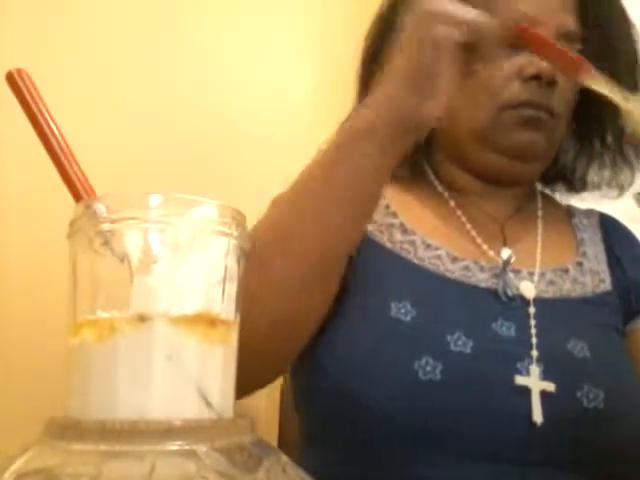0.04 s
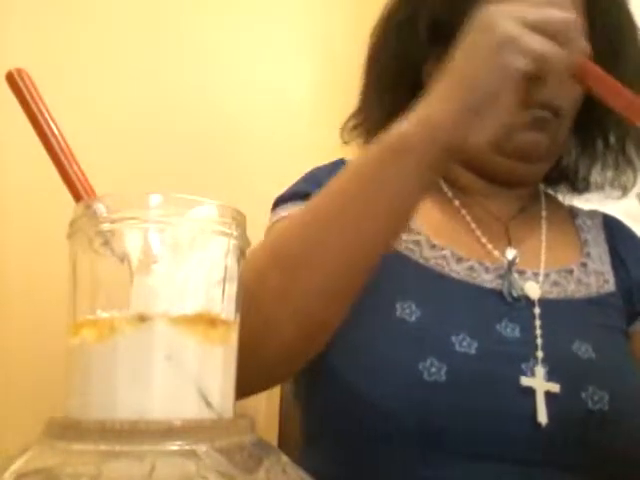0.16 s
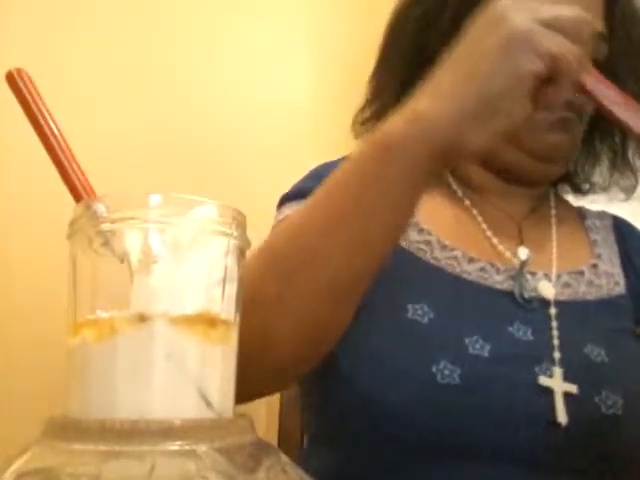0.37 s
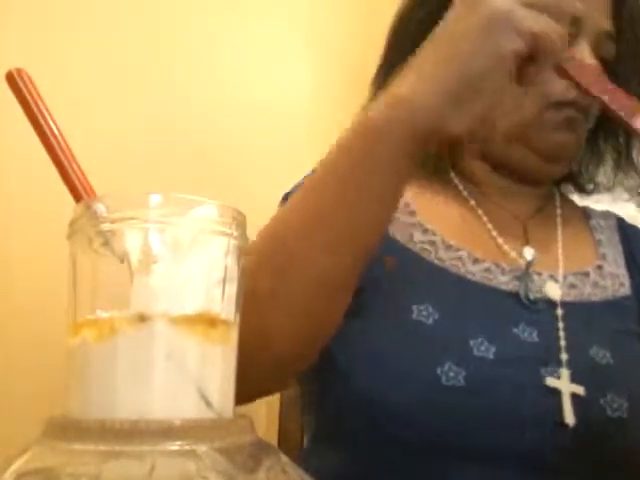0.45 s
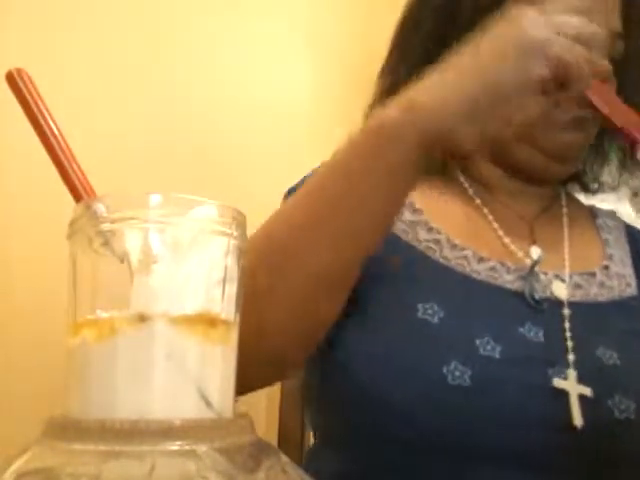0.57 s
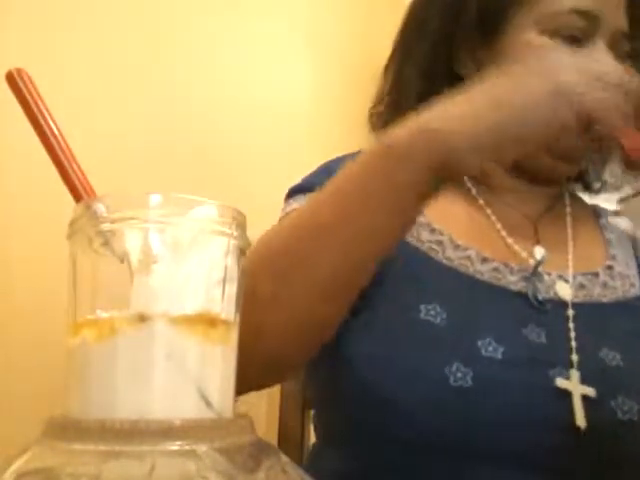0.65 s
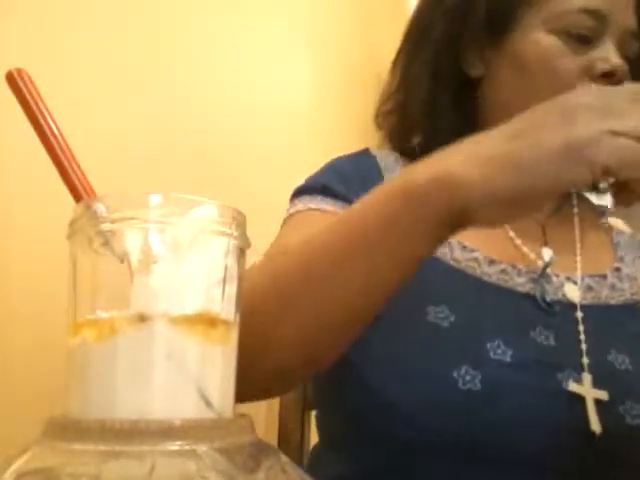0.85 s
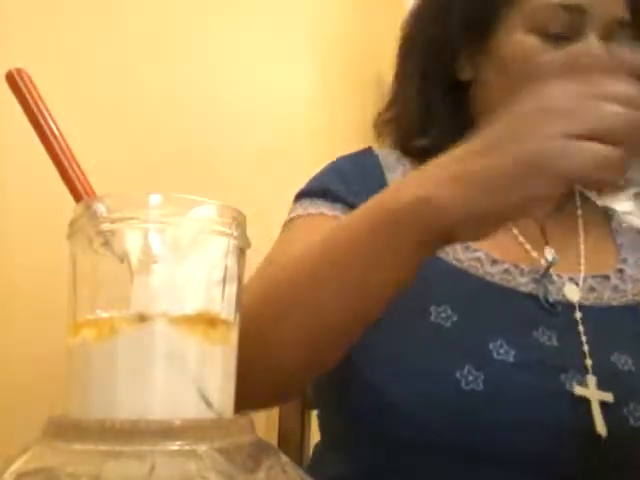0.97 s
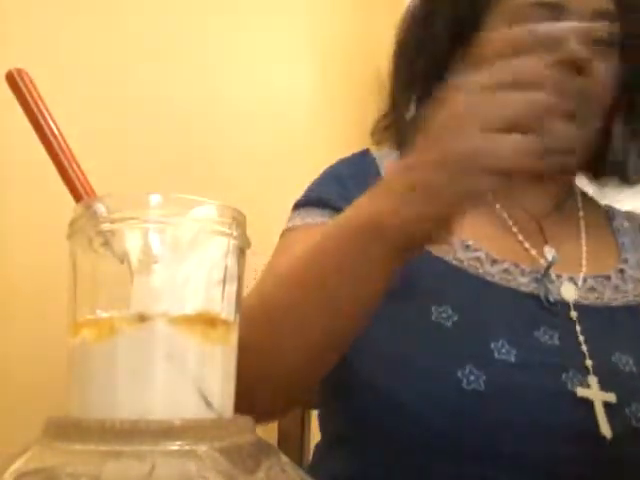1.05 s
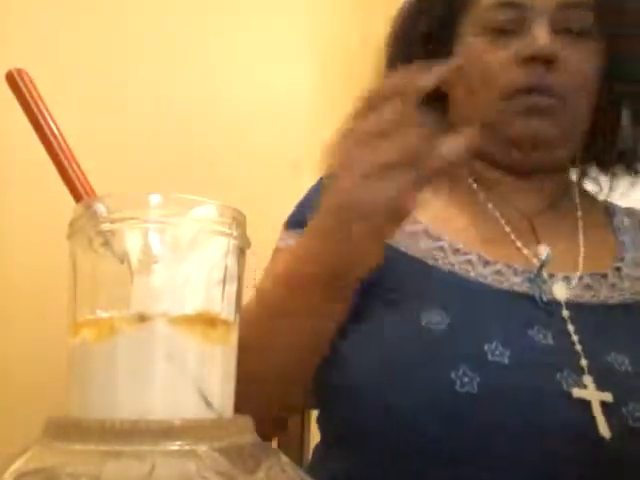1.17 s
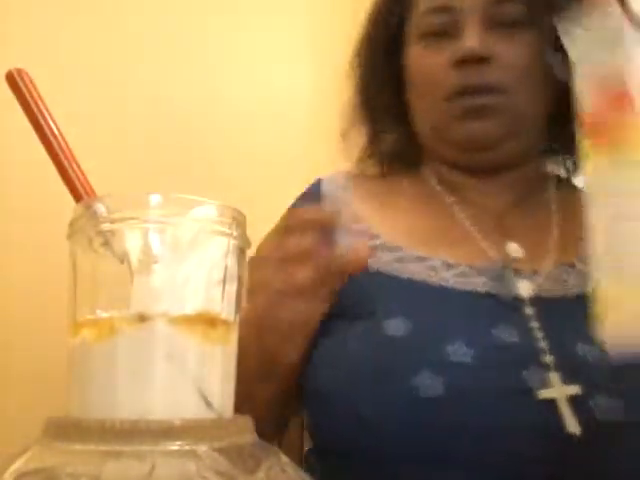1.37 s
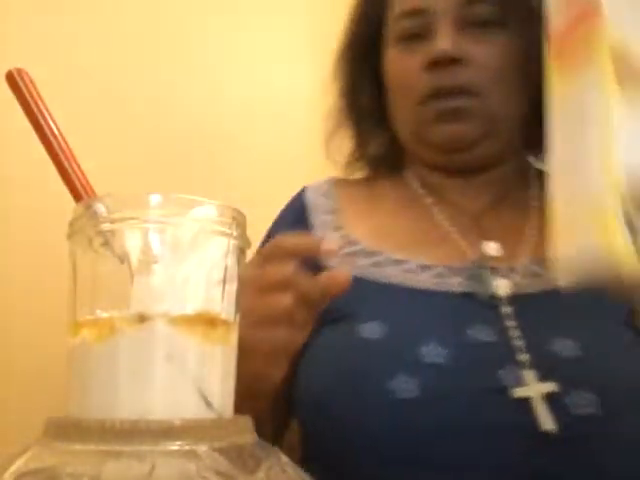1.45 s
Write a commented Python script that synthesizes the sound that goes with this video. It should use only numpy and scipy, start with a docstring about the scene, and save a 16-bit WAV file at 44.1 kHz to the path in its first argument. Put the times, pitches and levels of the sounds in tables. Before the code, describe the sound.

Quick scrapes and damped clinks of a metal spoon sound against a glass jar of thick mixture, with small plops, then thin to a few faint clicks. A small microphone catches it in a faintly humming kitchen.

```python
"""Over a faint mains hum in a kitchen, a metal spoon starts to scrape a thick mixture along the wall of a glass
jar. In a few quick strokes it catches and clicks on the glass, whose ring the mixture damps; pockets in the
mixture close with soft plops, the glass tinks with a high, brief ring and the pushed jar bumps dully. After
about a second the strokes fade, leaving a few faint clicks and the room's echo. A small microphone favours 800
Hz and 7 kHz in the scrapes and clicks."""
import sys
import numpy as np
from scipy import signal
from scipy.fft import rfft, irfft
from scipy.io import wavfile

SR = 44100
rng = np.random.default_rng(int(sys.argv[2]) if len(sys.argv) > 2 else 0)


def transcribe(signal):
    """Save signal, clipped to [-1, 1], as a 16-bit WAV file at the path in sys.argv[1]."""
    frames = np.atleast_2d(signal).T
    limited = np.clip(frames, -1, 1)
    pcm = np.round(limited * 32767).astype(np.int16)
    wavfile.write(sys.argv[1], SR, pcm)


N = 66150


def amp(db):
    """Decibels to amplitude ratio."""
    return 10 ** (np.asarray(db) / 20)


def unit(x):
    """Normalisation to an rms of 1."""
    return x / np.sqrt(np.mean(x ** 2) + 1e-20)


def add(mix, start_s, sound):
    """Superposition: a sound joins the mix at start_s."""
    part = mix[max(round(start_s * SR), 0):][:len(sound)]
    part += sound[:len(part)]


def response(points, low_hz=None, high_hz=None, size=4096):
    """Minimum-phase impulse response of unit energy with the given spectrum, optionally band-limited."""
    hz = abs(np.fft.fftfreq(size, 1 / SR)) + 1
    point_hz, point_db = np.transpose(points)
    gain = amp(np.interp(np.log(hz), np.log(point_hz), point_db))
    if low_hz:
        gain /= np.sqrt(1 + (low_hz / hz) ** 10)
    if high_hz:
        gain /= np.sqrt(1 + (hz / high_hz) ** 10)
    log_gain = np.log(np.maximum(gain, 1e-4))
    spectrum = np.exp(np.conj(signal.hilbert(log_gain)))
    ring = np.fft.ifft(spectrum).real[:size // 2]
    return ring / np.linalg.norm(ring)


def through(x, ring):
    """Convolution: x drives a linear system with impulse response ring."""
    return signal.fftconvolve(x, ring)[:N]


def damped_tones(table, rise_s, t60_s):
    """Free vibration: each row starts a sinusoid that rises softly and decays exponentially."""
    out, t = np.zeros(N), np.arange(SR // 5) / SR
    for start_s, level_db, pitch_hz in table:
        envelope = amp(level_db - 60 * t / t60_s) * (1 - np.exp(-t / rise_s))
        add(out, start_s, envelope * np.sin(2 * np.pi * pitch_hz * t))
    return out


def background(air_db=-67):
    """Steady noise floor: broadband room air plus the line spectrum of mains hum."""
    # spectrum of the air: frequency_hz, relative_density_db
    air_spectrum = [(20, -27.5), (40, -19.5), (85, -4), (130, -5), (210, -15.5), (370, -8), (655, -11),
                    (1500, -29), (2500, -25.5), (4200, -40), (5400, -31), (5900, -37), (6900, -14.5),
                    (8000, -37.5), (10000, -50.5), (13000, -58)]
    # partials of the hum: pitch_hz, rms_level_db
    partials = [(98, -75), (148, -72.5), (247, -77), (296, -81.5), (394, -86)]
    t = np.arange(N) / SR
    ring = response(air_spectrum)
    air = signal.fftconvolve(rng.standard_normal(N + len(ring) - 1), ring, "valid")
    hum = sum(amp(db) * np.sqrt(2) * np.sin(2 * np.pi * (hz * t + rng.random())) for hz, db in partials)
    return amp(air_db) * air + hum


def jar_rings(low_hz=1056, high_hz=5100):
    """Damped resonance: the jar's low, middle and high impulse responses, as the microphone hears them."""
    # colour of jar and microphone together: frequency_hz, relative_gain_db
    colour = [(20, -54), (50, -24.5), (85, -21.5), (230, -17), (400, -8), (650, -7), (810, 0.5), (960, -4),
              (1150, -8), (1380, -5.5), (1900, -8.5), (2300, -2.5), (2650, -4), (3000, -7), (3450, -6.5),
              (4700, -15.5), (5750, -13.5), (6400, -2.5), (7100, 0), (7500, -6), (8000, -12.5),
              (8700, -13.5), (9500, -20), (11700, -21.5), (14000, -51.5)]
    bands = [(None, low_hz), (low_hz, high_hz), (high_hz, None)]
    return [response(colour, *edges_hz) for edges_hz in bands]


def scrape(slips_per_s=3500, slip_spread_db=1.5, rub_db=-4.5, judder_db=1.16, judder_s=0.004):
    """Stick-slip friction: tiny slips and a smooth rub, modulated by the uneven grip, excite the jar."""
    # the mixture's low smear, the middle rasp and the high grit: time_s, smear_db, rasp_db, grit_db
    strokes = [(0, -106, -97, -69.5), (.085, -61.5, -68.5, -67.5), (.11, -55.5, -57, -46),
               (.18, -47.5, -53, -48), (.225, -47, -45, -40.5), (0.259, -50, -43.5, -38.5),
               (.272, -44.5, -38, -27.5), (.32, -39.5, -37.5, -31.5), (.375, -61.5, -45.5, -40.5),
               (0.401, -40, -41, -53), (0.429, -42.5, -42.5, -40), (.475, -46.5, -39, -38.5),
               (.545, -44.5, -43.5, -41.5), (0.601, -60, -52, -54), (0.629, -36, -42, -46),
               (0.65, -38.5, -36.5, -33), (.70, -42, -40.5, -36.5), (.745, -43, -38, -34),
               (.80, -36, -35.5, -28.5), (.86, -36.5, -31.5, -30), (.89, -57.5, -42, -43),
               (.95, -38, -48, -53), (0.994, -67.5, -61, -65.5), (1.015, -38, -46.5, -50),
               (1.047, -47.5, -49.5, -40.5), (1.085, -56.5, -60, -53.5), (1.12, -84, -92, -82.5),
               (1.5, -100, -112, -90)]
    times_s, *band_levels_db = np.transpose(strokes)
    t, knots_s = np.arange(N) / SR, np.arange(0, 2, judder_s)
    judder = amp(judder_db * np.interp(t, knots_s, rng.standard_normal(N)[:len(knots_s)]))
    sizes = amp(slip_spread_db * np.minimum(rng.exponential(1, N), 4))
    signs = rng.choice([-1, 1], N)
    slips = unit(sizes * signs * (rng.random(N) < slips_per_s / SR))
    out = np.zeros(N)
    for level_db, ring in zip(band_levels_db, jar_rings()):
        rub = amp(rub_db) * rng.standard_normal(N)
        friction = unit(judder * (slips + rub))
        out += through(friction * amp(np.interp(t, times_s, level_db)), ring)
    return out


def clicks(gain_db=-5, chatter_db=1.5, chatter_s=0.0016, size=400):
    """Impact excitation: each contact drives the jar with one sharp blow and dying micro-bounces."""
    # spoon on glass, relative levels from low band to high: start_s, knock_db, clack_db, clink_db
    contacts = [(0.0682, -38, -44, -47), (.0890, -29, -28, -16.5), (0.27, -8.5, -10.5, -15),
                (.2708, -17, -7, 2), (.2750, -18, -15, -8.5), (.2820, -41, -20, -8.5),
                (0.292, -22, -20, -11.5), (0.3127, -26, -6.5, -8.5), (0.435, -19, -12, -7.5),
                (.4380, -30, -15.5, -4.5), (.4448, -24.5, -15, -13), (.4691, -11.5, -6.5, -22),
                (0.4715, -14, -14, -18.5), (.5150, -29.5, -22, -27), (0.6446, -17.5, -20.5, -8),
                (0.7583, -22, -15.5, -8.5), (.7830, -20, -18.5, -13), (0.7918, -5, -9, -8.5),
                (.8127, -8, -13.5, -5.5), (0.816, -21.5, -14.5, -11), (0.8321, -8, -10.5, -2.5),
                (0.8593, -12, -7.5, -14), (0.8677, -3.5, -20, -21), (1.0290, -28.5, -18, -11.5),
                (1.1785, -52, -52, -58), (1.2840, -40.5, -50, -57), (1.3937, -45.5, -69, -66)]
    forces = np.zeros((3, N))
    fade = np.exp(-np.arange(size) / SR / chatter_s)
    for start_s, *band_levels_db in contacts:
        blow = amp(chatter_db) * rng.standard_normal(size) * fade / np.linalg.norm(fade)
        blow[0] += 1  # the impulse ahead of the chatter
        for force, level_db in zip(forces, band_levels_db):
            add(force, start_s, amp(level_db) * blow)
    return amp(gain_db) * sum(through(force, ring) for force, ring in zip(forces, jar_rings()))


def plops():
    """Cavity resonance: pockets in the mixture sound briefly as they close."""
    # closing pockets: start_s, level_db, pitch_hz
    pockets = [(.0898, -24.5, 713), (.158, -32, 561), (.229, -30.5, 900), (.3075, -17.5, 870),
               (.628, -39.5, 834), (.647, -23, 960), (.739, -23, 955), (.7985, -19.5, 935),
               (.944, -31.5, 813), (1.005, -31, 880), (1.015, -33.5, 870)]
    return damped_tones(pockets, rise_s=0.00034, t60_s=0.015)


def tinks():
    """Modal ringing: each tap on the glass excites one high, quickly damped mode of the jar."""
    # taps on the glass: start_s, level_db, pitch_hz
    taps = [(.1243, -22, 6830), (.2818, -2.5, 6660), (.3119, -8, 6660), (.7592, -13.5, 6870),
            (.7925, -7.5, 7520), (.8320, -14, 7070)]
    return damped_tones(taps, rise_s=0.0004, t60_s=0.0059)


def bumps():
    """Damped low-frequency vibration: the jar bumps dully as it is pushed."""
    # pushes on the jar: start_s, level_db, pitch_hz
    pushes = [(.150, -51, 145), (.280, -40.5, 218.4), (.300, -42, 100.8), (.303, -44, 329),
              (.770, -43, 133.8), (.795, -45.5, 92), (1.125, -70.5, 149.3), (1.165, -63, 298)]
    return damped_tones(pushes, rise_s=0.0024, t60_s=0.17)


def room(x, gain_db=-8.5, gap_s=0.009, reflections_per_s=4000):
    """Reverberation: dense random reflections follow a short gap, each band decaying at its own rate."""
    # decay of the kitchen by band: top_hz, t60_s
    decays = [(300, 0.98), (1200, 0.43), (3000, 0.43), (6000, 0.48), (9000, 0.46), (16000, 0.31)]
    t, hz = np.arange(SR) / SR, np.fft.rfftfreq(SR, 1 / SR)
    signs = rng.choice([-1, 1], SR)
    arrivals = (rng.random(SR) < reflections_per_s / SR) & (t > gap_s)
    spectrum = rfft(signs * arrivals)
    tail, bottom_hz = np.zeros(SR), 0
    for top_hz, t60_s in decays:
        band = irfft(spectrum * ((hz >= bottom_hz) & (hz < top_hz)), SR)
        tail += band * amp(-60 * t / t60_s)
        bottom_hz = top_hz
    return amp(gain_db) * through(x, tail / np.linalg.norm(tail))


def scene():
    """Superposition of the direct sound, its reverberation and the noise floor, in one channel."""
    stirring = scrape() + clicks() + plops() + tinks() + bumps()
    return (stirring + room(stirring) + background())[None]


def record(dry, cutoff_hz=11950):
    """Band limiting: a linear-phase low-pass filter removes the highest treble."""
    lowpass = signal.firwin(301, cutoff_hz, window=("kaiser", 8), fs=SR)
    return signal.oaconvolve(dry, lowpass[None], "same")


dry = scene()
out = record(dry)
transcribe(out)
```